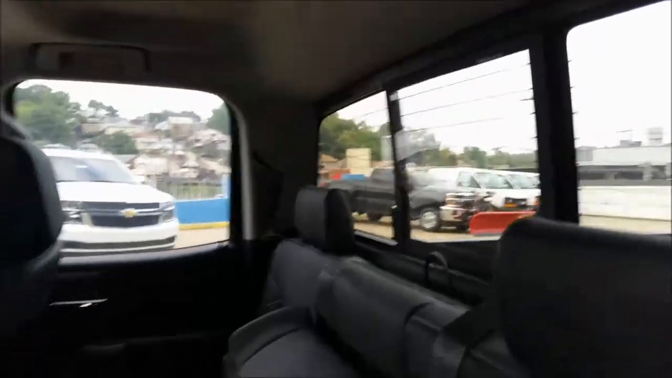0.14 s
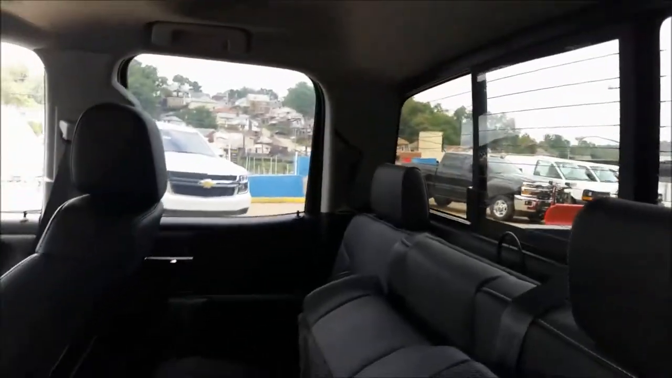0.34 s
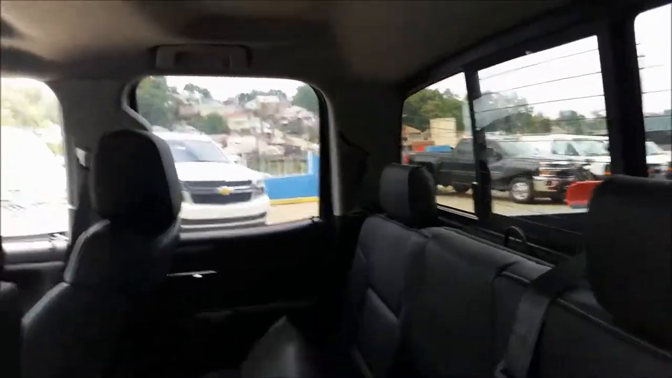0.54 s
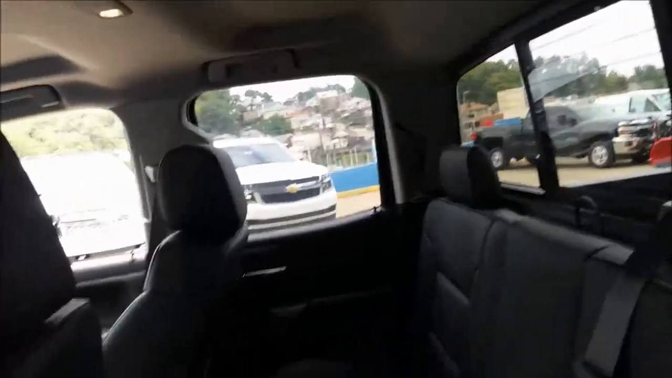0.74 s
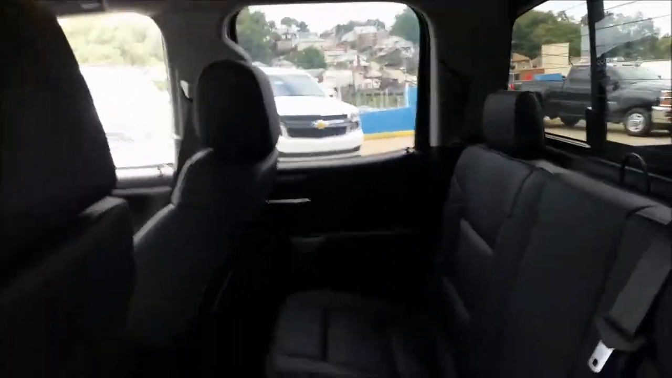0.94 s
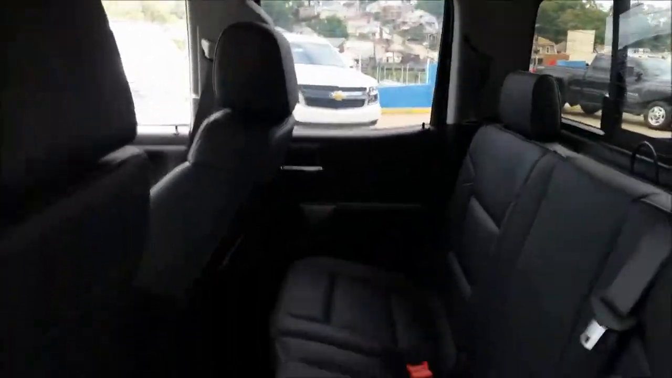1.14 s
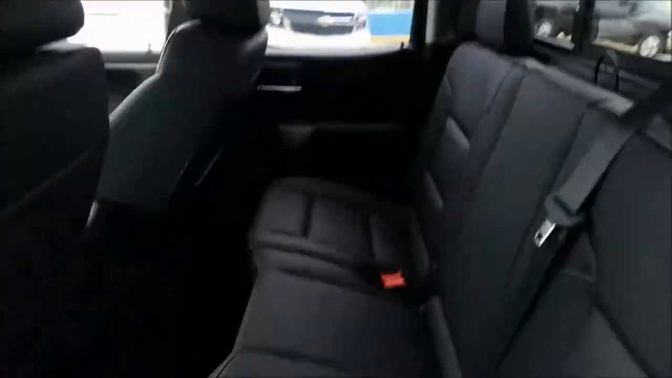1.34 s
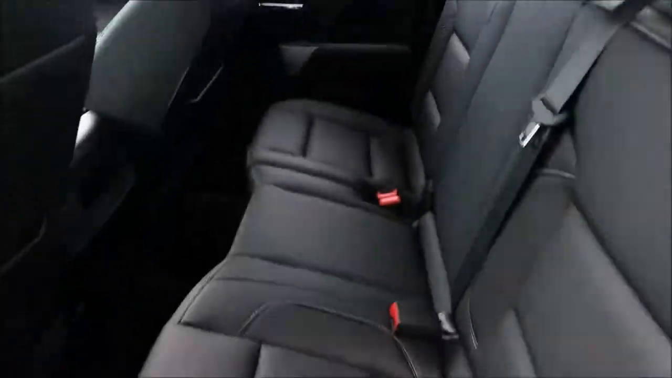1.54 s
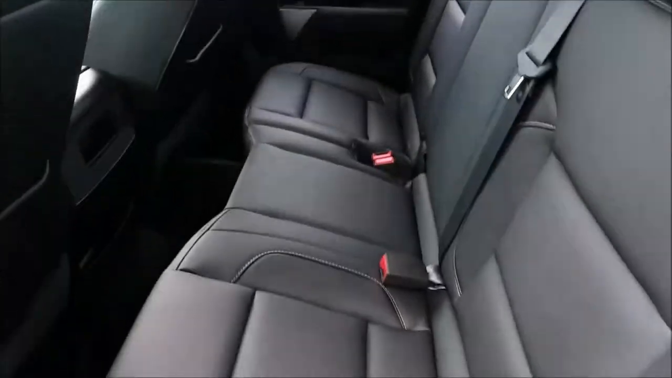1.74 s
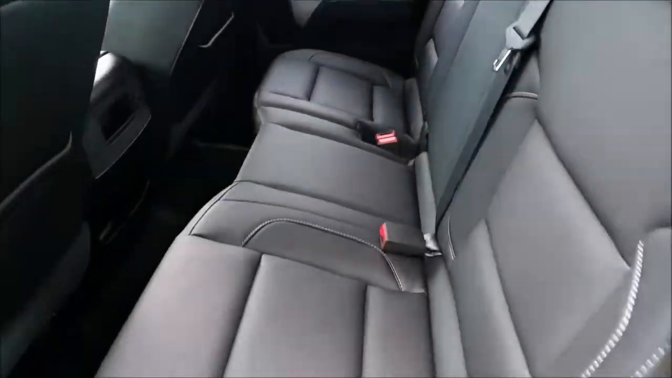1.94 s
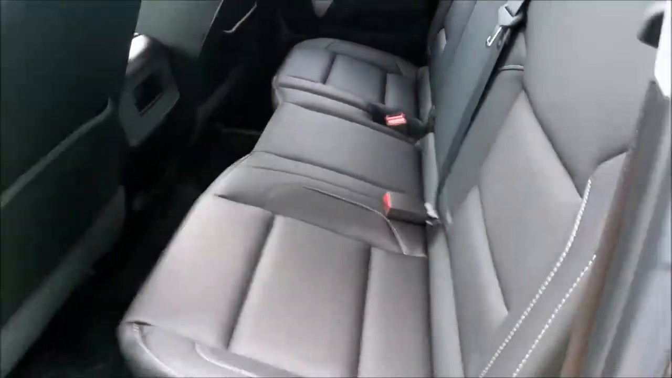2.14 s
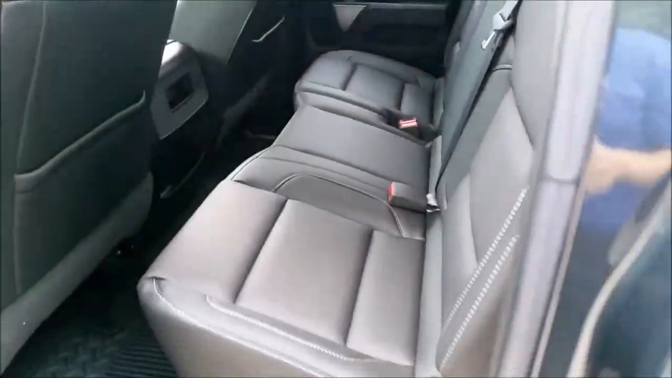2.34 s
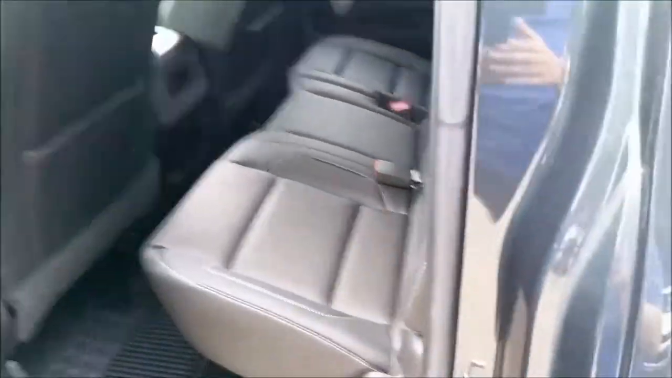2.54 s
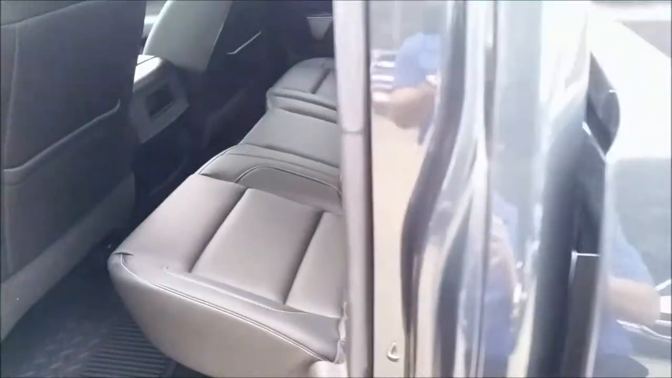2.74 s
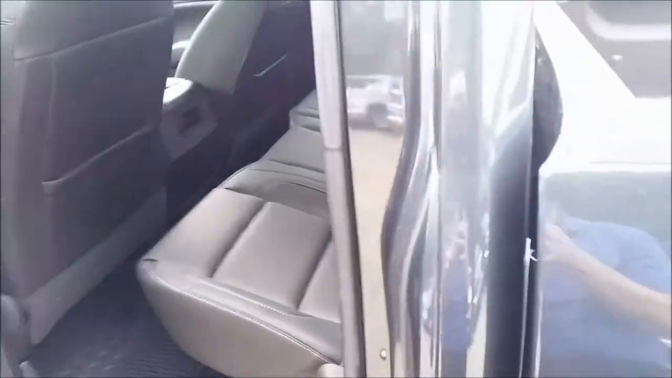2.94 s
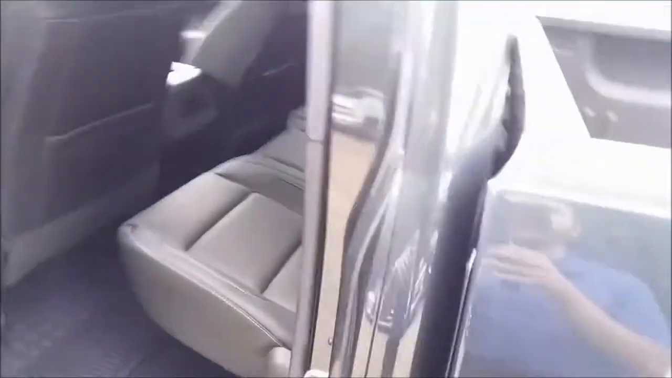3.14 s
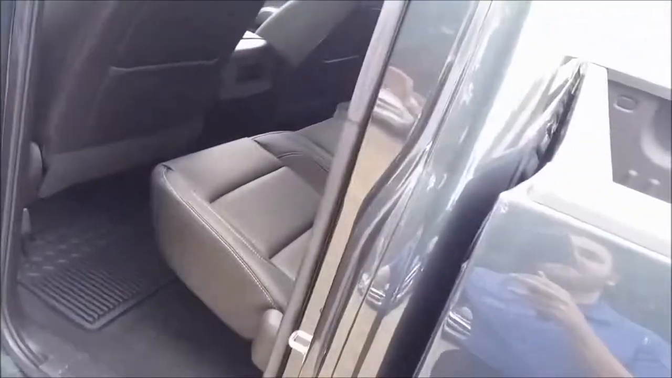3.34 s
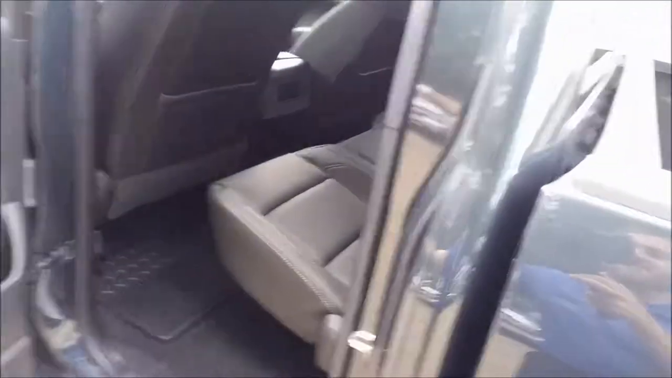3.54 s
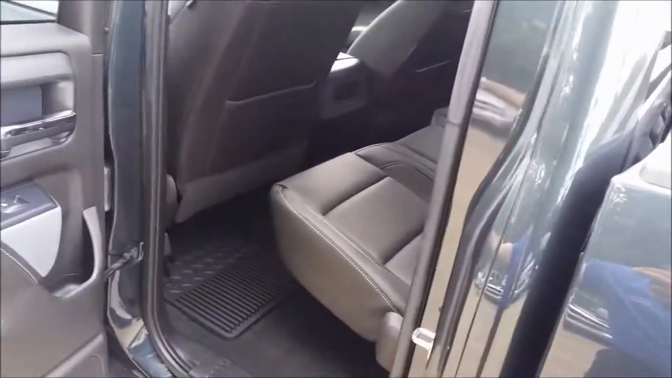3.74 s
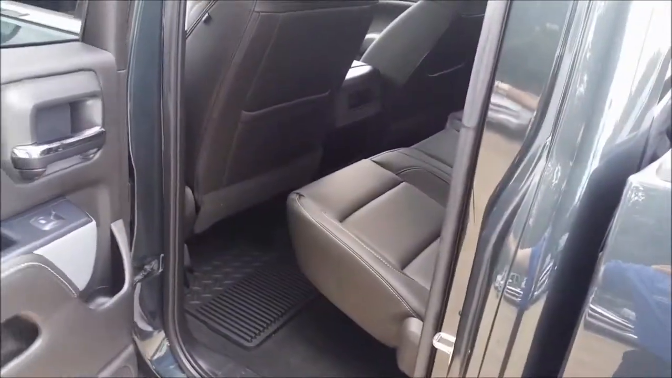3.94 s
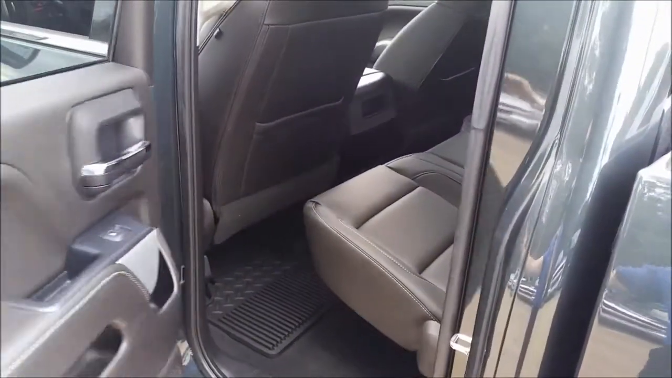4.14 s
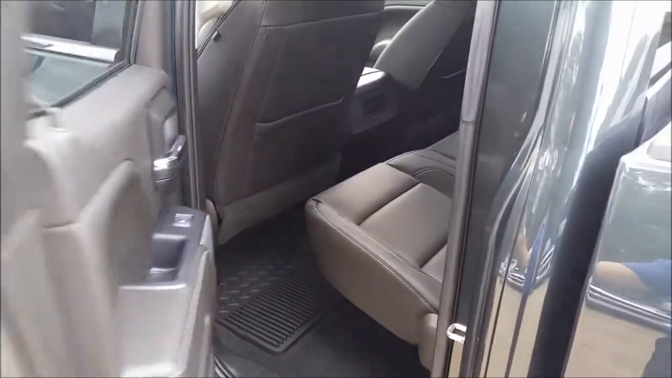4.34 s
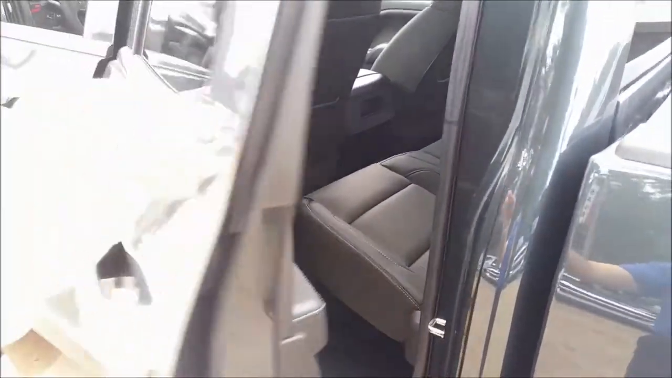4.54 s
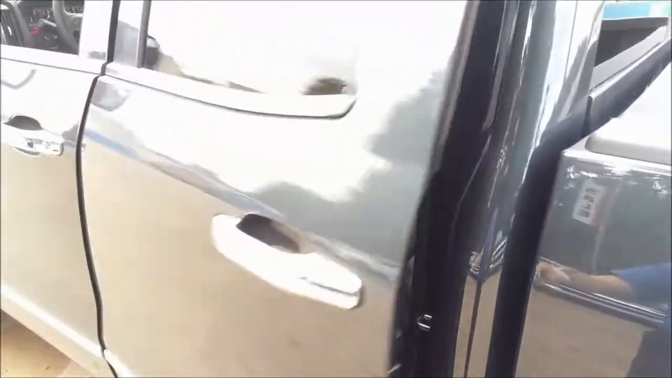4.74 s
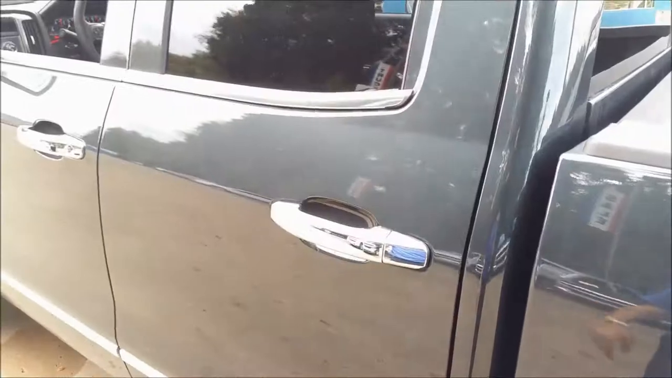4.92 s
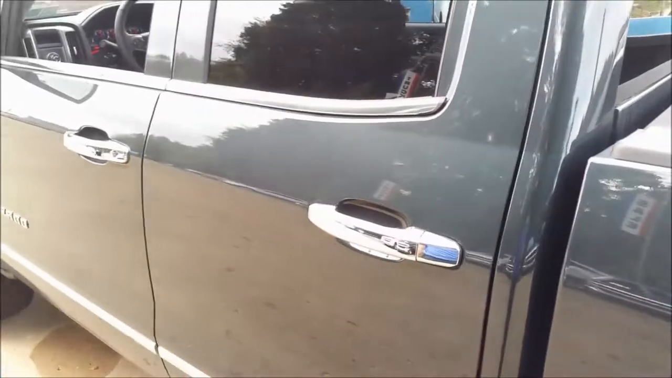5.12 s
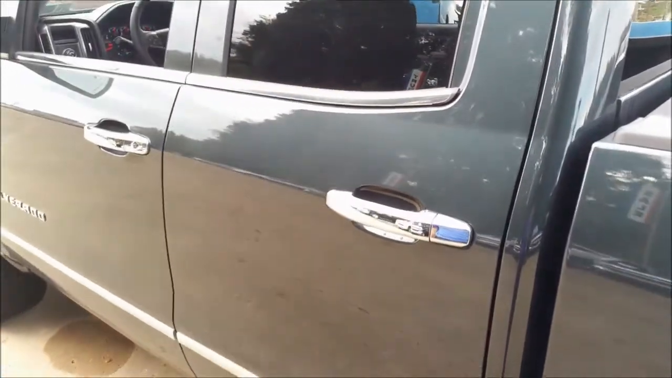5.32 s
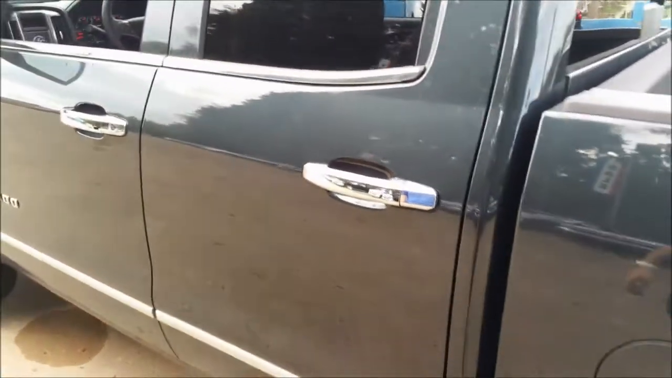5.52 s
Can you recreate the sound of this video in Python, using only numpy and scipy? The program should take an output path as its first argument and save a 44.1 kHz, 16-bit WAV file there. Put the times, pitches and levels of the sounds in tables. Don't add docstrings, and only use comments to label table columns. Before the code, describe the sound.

Beside an idling pickup, a low, lumpy V8 hum runs throughout with soft yard noise. Early on, leather hisses briefly, buckles snap and a padded seat cushion drops with a deep thud. The idle dulls, then grows clearer as the close handheld microphone leaves the cab. Finally the latch clicks and the door slams hard, rattling, with four loose taps dying away.

```python
import sys
import numpy as np
from scipy import signal
from scipy.fft import rfft, irfft, next_fast_len
from scipy.io import wavfile
from scipy.ndimage import uniform_filter1d

SR = 44100
rng = np.random.default_rng(int(sys.argv[2]) if len(sys.argv) > 2 else 0)


def natural_amplitude(level_db):
    exponent = np.asarray(level_db, float) / 20
    return 10 ** exponent


def store_wav(level_fs):
    pcm = np.round(np.clip(np.atleast_2d(level_fs), -1, 1) * 32767)
    wavfile.write(sys.argv[1], SR, pcm.T.astype(np.int16))


N = 246078

ENGINE_DB = -36.5

# pitch_hz, level_db, t60_s
SEAT_FRAME = [(325, -5.5, 0.053), (510, -11, 0.1), (730, -8, 0.051), (940, -7, 0.02), (1400, -4, 0.0074)]
# pitch_hz, level_db, t60_s
DOOR_SKIN = [(417, -2.5, 0.14), (550, -5, 0.06), (770, 8.5, 0.035), (900, 10, 0.023), (1270, 4, 0.022),
             (1520, -2, .04), (1954, -20, 0.038)]
# pitch_hz, level_db (per Hz)
DOOR_CRACK = [(400, -2), (1000, 12.5), (2000, 3), (3000, -12), (4600, -32), (7500, -9), (9500, -16),
              (13000, -21), (16000, -26)]


def unit(x):
    return x / np.sqrt(np.mean(x ** 2))


def curve(table):
    start_s, level_db = np.transpose(table)
    return np.interp(np.arange(N) / SR, start_s, level_db)


def on_log(hz, table):
    pitch_hz, level_db = np.transpose(table)
    return np.interp(np.log(hz), np.log(pitch_hz), level_db)


def band(x, lo_hz, hi_hz, order=2):
    edges_hz = [lo_hz, min(hi_hz, .45 * SR)]
    return signal.sosfilt(signal.butter(order, edges_hz, "bandpass", fs=SR, output="sos"), x)


def walk(rate):
    hold = int(SR / rate)
    steps = np.repeat(rng.standard_normal(N // hold + 1), hold)
    return 1.304 * uniform_filter1d(uniform_filter1d(steps, hold), hold)[:N]


def burst(start_s, rise_s, t60_s):
    since = np.maximum(np.arange(N) / SR - start_s, 0)
    return (1 - np.exp(-since / rise_s)) * 1000. ** (-since / t60_s)


def ring(modes, t, push_s, spread):
    out = 0
    chance = rng.standard_normal((2 * len(modes), 3))
    for (hz, db, t60_s), (share, detune, turn) in zip(modes * 2, chance):
        tone = np.sin(2 * np.pi * hz * (1 + spread * detune) * t + .5 * turn)
        out = out + natural_amplitude(db + 1.3 * share) * tone * 1000. ** (-t / t60_s)
    out = out * (1 - np.exp(-t / push_s))
    return out / np.abs(out).max()


def knocks(rows, low, high, crack, push_s, spread, spike, lag_s, pan_db, wet_db, wet_t60):
    t = np.arange(SR // 3) / SR
    start = int(rows[0][0] * SR)
    dry = np.zeros(int(rows[-1][0] * SR) - start + SR)
    colour = natural_amplitude(on_log(np.maximum(np.fft.rfftfreq(len(t), 1 / SR), 1), crack))
    tick = np.roll(irfft(colour, len(t)), shift=30) * (t < .003)
    tick = tick / tick.max()
    for s, low_db, high_db, click_db, click_t60 in rows:
        scrape = unit(irfft(rfft(rng.standard_normal(len(t))) * colour, len(t)))
        click = scrape * 1000. ** (-t / click_t60) - spike * tick
        blow = natural_amplitude(low_db) * ring(low, t, push_s, spread / 2)
        blow = blow + natural_amplitude(high_db) * ring(high, t, push_s / 4, spread)
        blow = blow + natural_amplitude(click_db) * click
        at = int((s + .0008) * SR) - start
        dry[at:at + len(t)] += blow
    tails = band(rng.standard_normal((2, len(t))), 610, 5200, order=1)
    tails = tails * 1000. ** (-t / wet_t60) * (t > .002)
    tails = tails / np.sqrt(np.sum(tails ** 2, axis=1, keepdims=True))
    wet = signal.fftconvolve(dry[None], tails, axes=1)[:, :len(dry)]
    places = np.arange(len(dry))
    late = np.interp(places - lag_s * SR, places, dry)
    direct = np.array([late * natural_amplitude(pan_db / 2), dry * natural_amplitude(-pan_db / 2)])
    out = np.zeros((2, N + SR))
    out[:, start:start + len(dry)] = direct + natural_amplitude(wet_db) * wet
    return out[:, :N]


def engine(engine_db, fan_db):
    cylinder_db = [0, 4.5, -4.5, -3, -3, -4, -0.5, 0.5]
    # pitch_hz, width_hz, level_db
    exhaust = [(36.8, 8.4, -3), (71.4, 15, 2.5), (123.5, 11, -3.5), (142.6, 27, -2.5), (275, 96, -10),
               (430, 115, -13.5)]
    # pitch_hz, level_db (under the engine)
    orders = [(58, -17.5), (116, -10), (145.2, -10.5), (290, -26), (319, -25.5), (360, -30), (410, -25)]
    firing_hz = 36.14
    count = int(N / SR * firing_hz) - 1
    jitter, strength = rng.standard_normal((count, 2)).T
    at = (np.arange(count) + .5 + .03 * jitter) * SR / firing_hz
    pulses = np.zeros(N)
    pulses[at.astype(int)] = natural_amplitude(np.resize(cylinder_db, count) + 2.0 * strength)
    pipe = 0
    for k, (hz, width_hz, db) in enumerate(exhaust):
        resonance = unit(band(pulses, hz - width_hz / 2, hz + width_hz / 2, order=1))
        pipe = pipe + (-1) ** k * natural_amplitude(db) * resonance

    drift = np.cumsum(1 + 0.002 * walk(1.493)) / SR
    lines = [(hz, engine_db + db) for hz, db in orders]
    boom_db = -47 + .35 * (engine_db - ENGINE_DB) + 2.5 * walk(3)
    lines += [(72.6, boom_db), (232, fan_db), (992, -70)]
    hum = 0
    for hz, db in lines:
        hum = hum + natural_amplitude(db + 1.55 * walk(4.97)) * np.sqrt(2) * np.sin(2 * np.pi * hz * drift)
    return natural_amplitude(engine_db - 6.0) * unit(pipe) + hum


def shove():
    # start_s, level_db
    shoves = [
        (.46, -51),
        (1.03, -48),
    ]
    foam = unit(band(rng.standard_normal(N), 90, 470, order=1))
    return foam * sum(natural_amplitude(db) * burst(s, rise_s=0.05, t60_s=0.34) for s, db in shoves)


def slide():
    # start_s, level_db (against the fastest slip)
    drag = [(.48, -46), (.6, -22), (.702, -24), (.718, -5.5), (.745, -0.5), (.775, 0.5), (.81, -20),
            (.835, -22), (.85, -40)]
    t = np.arange(N) / SR
    drag_db = curve(drag)
    moving = 1. * (t > drag[0][0]) * (t < drag[-1][0] + .1)
    moving = uniform_filter1d(moving, size=2000)
    slips = rng.standard_normal((5, N)) * natural_amplitude(1.5 * walk(250))

    hiss = unit(band(slips[:2], 8300, 19000) + 0.44 * band(slips[:2], 5200, 9600))
    hiss = hiss * natural_amplitude(-30.5 + drag_db + np.array([[-1.5], [1.5]]))

    rub = slips[2] + 4.2 * slips[:2]
    rustle_db = -32.5 + 1.1 * np.interp(t - 0.03, t, drag_db)
    rustle = unit(band(rub, 2600, 7000, order=1)) + unit(band(rub, 570, 3100))
    rustle = rustle * natural_amplitude(rustle_db + 2.1 * walk(88.5))

    rumble_db = -31.5 + 0.39 * np.interp(t - 0.012, t, drag_db)
    rumble = unit(band(slips[3], 79, 270, order=1)) * natural_amplitude(rumble_db)

    pump = natural_amplitude(-22.5) * burst(0.825, rise_s=.02, t60_s=1)
    sway = unit(band(slips[4], 24, 34.3)) * (natural_amplitude(-55) * moving + pump)
    return (hiss + rustle + rumble) * moving + sway


def seat_drop():
    # start_s, thud_db, frame_db, click_db (all peaks), click_t60_s
    seat = [(0.673, -28, -20, -54, 0.03), (0.681, -26, -19, -45, 0.03), (0.791, -43, -23, -29, 0.026),
            (0.816, -37, -41, -35, 0.058), (0.823, -25, -9.5, -18.5, 0.042), (0.829, 2, -25, -30, 0.03),
            (0.856, -4.5, -19.5, -40, 0.03), (0.871, -7.5, -34, -49, 0.03), (0.886, -17, -26, -40.5, 0.033),
            (0.92, -9.5, -27, -36, 0.035), (0.928, -3.5, -21, -61, 0.03)]
    # pitch_hz, level_db, t60_s
    cushion = [(65, -9, 0.29), (89.4, -3.5, 0.17), (130, -4.5, 0.16), (165.6, 12.5, 0.059), (212, 2, 0.05),
               (269, 2, 0.052)]
    # pitch_hz, level_db (per Hz)
    seat_crack = [(500, -10), (1200, 5.5), (2800, 13.5), (5300, -4), (7600, 4.5), (9500, -21), (12000, -7),
                  (16000, -18)]
    return knocks(seat, cushion, SEAT_FRAME, seat_crack, push_s=0.0034, spread=0.0503, spike=0.93,
                  lag_s=0.00024, pan_db=-1.4, wet_db=-9.5, wet_t60=0.07)


def buckle_snaps():
    # start_s, thud_db, frame_db, click_db (all peaks), click_t60_s
    snaps = [
        (0.53, -20, -22.5, -41, 0.036),
        (0.587, -23, -24.5, -37, 0.024),
        (1.022, -17, -29, -29, 0.036),
    ]
    # pitch_hz, level_db, t60_s
    seat_base = [(60, -9, 0.11), (110, -2.5, 0.11), (169, 1, 0.075), (240, -0.5, 0.036)]
    # pitch_hz, level_db (per Hz)
    snap_crack = [(700, 3), (1300, -6), (3000, 6), (4200, -8.5), (5500, 0.5), (7500, 3.5), (9300, -12),
                  (11000, -8), (16000, -14)]
    return knocks(snaps, seat_base, SEAT_FRAME, snap_crack, push_s=0.001, spread=0.052, spike=5.5,
                  lag_s=0.00021, pan_db=-1.5, wet_db=-9.0, wet_t60=0.023)


def door_slam():
    # start_s, thud_db, skin_db, click_db (all peaks), click_t60_s
    door = [
        (4.274, -29, -45, -55, 0.026),
        (4.443, -24, -49, -41, 0.024),
        (4.949, -2.5, 0.5, -12.5, 0.033),
        (4.963, -7, -32, -38, 0.072),
        (4.976, -3.5, -6.5, -13, 0.048),
        (4.997, -17, -12, -36, 0.04),
        (5.011, -11.5, -20, -24, 0.06),
        (5.034, -11.5, -42, -43, 0.04),
        (5.099, -19.5, -47, -56, 0.04),
    ]
    # pitch_hz, level_db, t60_s
    door_shell = [(37.2, -7.5, 0.24), (63.2, -13.5, 0.48), (125.5, -10, 0.25), (166, -4.5, 0.17),
                  (203, 1.5, 0.072), (240, 4, 0.092), (304, 4, 0.052)]
    return knocks(door, door_shell, DOOR_SKIN, DOOR_CRACK, push_s=0.0022, spread=0.058, spike=0.26,
                  lag_s=-0.000055, pan_db=-0.5, wet_db=-18.0, wet_t60=0.22)


def door_latch():
    # start_s, knock_db, ring_db, click_db (all peaks), click_t60_s
    latch = [
        (4.931, -25, -47, -52, .02),
        (4.937, -18, -15.5, -48, .02),
    ]
    # pitch_hz, level_db, t60_s
    latch_ring = [(1293, 6, 0.086), (1306, -5, .1), (1090, -16, .08), (1500, -19, 0.073)]
    return knocks(latch, DOOR_SKIN, latch_ring, DOOR_CRACK, push_s=0.0014, spread=.005, spike=.3,
                  lag_s=-0.000048, pan_db=-3.0, wet_db=-5, wet_t60=0.075)


def door_clatter():
    # start_s, level_db
    shakes = [
        (4.945, -26),
        (4.976, -43),
    ]
    grains = rng.standard_normal((3, N)) * natural_amplitude(4.0 * walk(400))
    clatter = unit(band(grains[2] + .5 * grains[:2], 750, 2900))
    clatter = clatter + natural_amplitude(-6) * unit(band(grains[2] + grains[:2], 1900, 3600))
    clatter = clatter + natural_amplitude(-22) * unit(band(grains[:2], 4000, 15000, order=1))
    shaking = 0
    for s, db in shakes:
        settling = natural_amplitude(-24) * burst(s, 0.0069, t60_s=0.52)
        shaking = shaking + natural_amplitude(db) * (burst(s, 0.0069, t60_s=0.14) + settling)
    return clatter * shaking


def trim_taps():
    # start_s, knock_db (peak)
    taps = [
        (5.079, -11.5),
        (5.199, -12),
        (5.329, -16.5),
        (5.455, -17.5),
    ]
    # delay_s, knock_db, ring_db, click_db (against the tap)
    bounces = [
        (.011, -10.5, -12, -10.5),
        (.018, -12, -14.5, -16.5),
    ]
    # start_s, knock_db (peak)
    back_taps = [
        (5.148, -33),
        (5.287, -37.5),
    ]
    # pitch_hz, level_db, t60_s
    trim_low = [(376, -7.5, 0.12), (461, 1, 0.043), (605, 7, 0.034), (680, -4, 0.02), (845, -8, 0.066)]
    trim_high = [(1124, 4, 0.037), (1230, -1.5, 0.047), (1440, -11, 0.016), (1650, -2.5, 0.04),
                 (1830, -16, 0.03), (2010, -6.5, 0.041), (2440, -1, 0.016)]
    # pitch_hz, level_db (per Hz)
    trim_crack = [(300, -14), (900, -2), (1800, 1), (2600, 2.5), (3800, -9), (5300, -12), (7500, -18),
                  (9000, -32), (16000, -35)]
    hits = []
    for s, db in taps:
        for late_s, knock_db, ring_db, click_db in [(0.0006, 0, 0, 0)] + bounces:
            hits.append((s + late_s, db + knock_db, db - 3.5 + ring_db, db - 9.5 + click_db, 0.018))
    for s, db in back_taps:
        hits.append((s, db, db - 3.5 - 4, db - 9.5 - 12, 0.018))
    return knocks(sorted(hits), trim_low, trim_high, trim_crack, push_s=0.00066, spread=0.033, spike=2.4,
                  lag_s=-0.000034, pan_db=-0.5, wet_db=-20.5, wet_t60=0.07)


def insect():
    # start_s, level_db
    chirps = [(.31, -72), (1.28, -86), (2.35, -75), (3.41, -74), (4.36, -74), (5.37, -82)]
    t, loudness = np.arange(N) / SR, 0
    for s, db in chirps:
        loudness = loudness + natural_amplitude(db) * np.sin(np.pi * np.clip((t - s) / 0.095, 0, 1)) ** .5
    return loudness * np.sin(2 * np.pi * 11080 * t)


def yard(engine_db, yard_db, hiss_db):
    # pitch_hz, level_db (per Hz)
    ground = [(13, -46), (22, -16), (76, -1), (152, -6.5), (197, -11.5), (233, -13.5), (260, -14.5),
              (1800, -29), (2340, -77), (3960, -120)]
    # pitch_hz, side_db (against the middle)
    width = [(60, -13), (110, -20.5), (200, -4), (380, -8), (700, -0.5), (1290, 3), (2380, -0.5),
             (4400, 1.5), (8120, 0.5), (15000, 1)]
    # pitch_hz, level_db (per Hz)
    air = [(2000, 0), (2600, 0), (3200, -5.5), (3900, -9), (4400, -9), (5500, -13.5), (5900, -13.5),
           (6100, -9), (6300, -9.5), (6500, -12.5), (6750, -11), (8300, -20.5), (9600, -27), (12500, -22.5)]
    size = next_fast_len(N)
    hz = np.maximum(np.fft.rfftfreq(size, 1 / SR), 1)
    air_db = -31
    shape = natural_amplitude(on_log(hz, ground[:-2] + [(f, db + air_db) for f, db in air]))
    bass = shape[(hz > 40) & (hz < 300)]
    shape = shape / np.sqrt(2 * np.sum(bass ** 2) / size)
    noise = rfft(rng.standard_normal((2, size))) * [shape, shape * natural_amplitude(on_log(hz, width))]
    out, swell = 0, walk(1.453)
    for octave in np.arange(4, 14.5, .5):
        window = np.cos(np.pi * np.clip(np.log2(hz) - octave, -.5, .5)) ** 2
        mid, side = irfft(noise * window, size)[:, :N]
        level_db = engine_db + np.interp(octave, [7.6, 8.8], [0, 1]) * (yard_db - engine_db)
        level_db = level_db + np.interp(octave, [11.3, 12.3], [0, 1]) * (hiss_db - yard_db)
        flicker_db = 1.06 * swell + 0.79 * walk(12)
        out = out + natural_amplitude(level_db + flicker_db) * (mid + side * np.array([[1], [-1]]))
    return natural_amplitude(-3.0) * out


def scene():
    # start_s, open_db (against the open doorway)
    openness = [(0, -3.5), (.3, -3), (.46, -1), (1.05, -2.5), (1.13, -6.5), (1.6, -8), (1.98, -7),
                (2.2, -3.5), (2.45, -1.5), (3.0, 0.25), (4.2, 0.03), (4.8, 1), (5.12, -0.9), (5.3, -4.5),
                (5.58, -4.5)]
    open_db = curve(openness)
    away_db = -4.5 * np.clip((.62 - np.arange(N) / SR) / .15, 0, 1)
    engine_db = ENGINE_DB + 1.3 * open_db
    yard_db = -35.5 + .8 * open_db
    hiss_db = -35 + 1.36 * open_db + away_db
    fan_db = -48 + 2.2 * open_db
    steady = engine(engine_db, fan_db) + yard(engine_db, yard_db, hiss_db)
    steady = steady * natural_amplitude(np.array([[-.45], [.45]]))
    seat = shove() + slide() + seat_drop() + buckle_snaps()
    door = door_latch() + door_slam() + door_clatter() + trim_taps()
    return steady + seat + door + insect()


def roll_off(x):
    return signal.sosfilt(signal.butter(12, 16470, fs=SR, output="sos"), x)


def record(dry):
    # pitch_hz, level_db
    whines = [(15000, -106), (12230, -96), (9100, -125)]
    own = natural_amplitude(-79) * unit(band(rng.standard_normal(dry.shape), 7900, 19000, order=1))
    for hz, db in whines:
        own = own + natural_amplitude(db) * np.sqrt(2) * np.sin(2 * np.pi * hz * np.arange(N) / SR)
    rounded = np.tanh(0.9 * (dry + own)) / 0.89
    top_cut = signal.ellip(10, .2, 40, 15720, fs=SR, output="sos")
    return roll_off(signal.sosfilt(top_cut, rounded))


dry = scene()
out = record(dry)
store_wav(out)
```